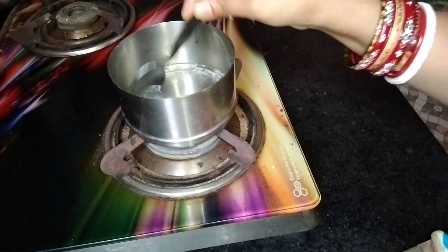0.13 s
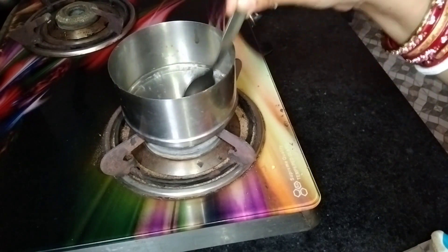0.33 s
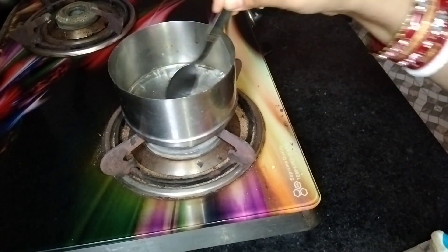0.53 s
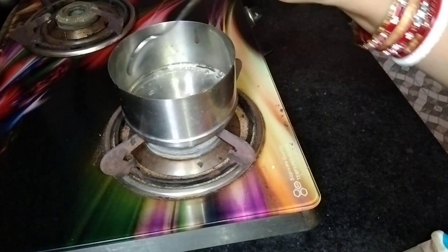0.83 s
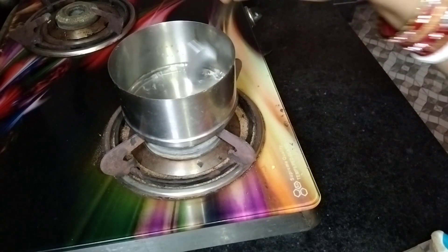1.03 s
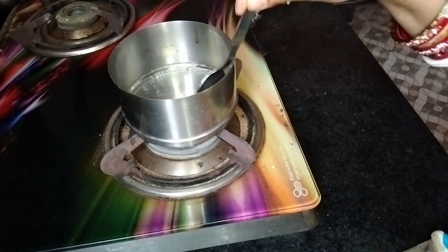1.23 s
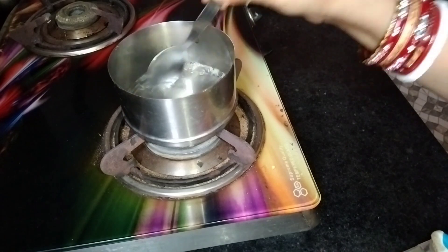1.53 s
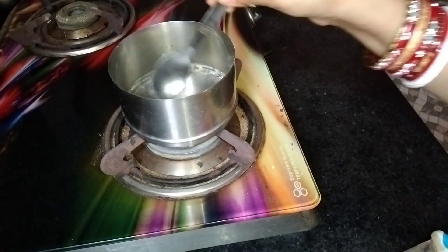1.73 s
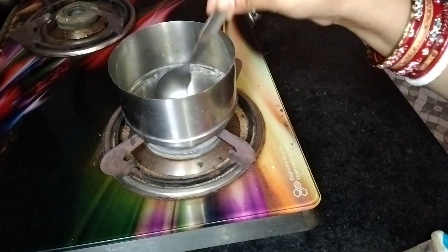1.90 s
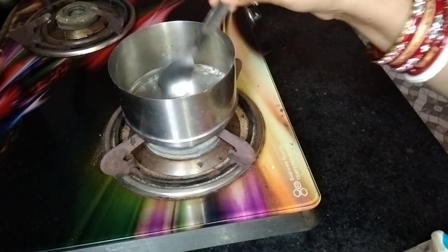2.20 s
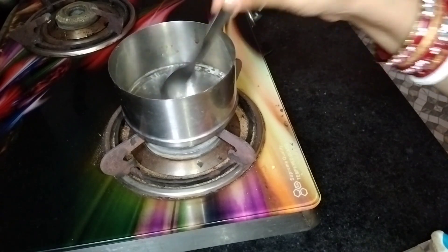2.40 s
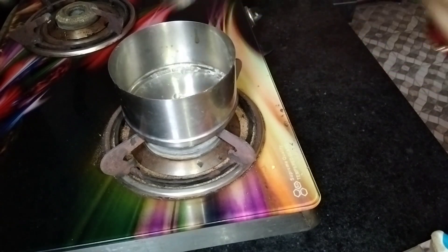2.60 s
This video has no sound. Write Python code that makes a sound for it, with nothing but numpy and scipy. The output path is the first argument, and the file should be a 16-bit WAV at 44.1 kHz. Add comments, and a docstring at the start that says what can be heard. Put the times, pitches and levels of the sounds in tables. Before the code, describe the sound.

Metal spoon scraping round a small metal pot, with irregular clinks and clunks.

```python
"""A steel spoon stirs syrup in a small steel pot on a kitchen gas burner, close to one microphone.
The spoon scrapes round the bottom and rubs a sliding note out of the wall. On each turn it knocks
the wall, so that the pot clunks on its support; struck clear of the syrup, the steel rings on.
Behind the pot, the kitchen answers briefly over a faint hiss."""
import sys
import numpy as np
from scipy import signal
from scipy.fft import rfft, irfft, next_fast_len
from scipy.io import wavfile
from scipy.ndimage import map_coordinates

SR = 44100
rng = np.random.default_rng(int(sys.argv[2]) if len(sys.argv) > 2 else 0)


def to_wav(sig):
    """Store sig (one row per channel, or 1-D mono) as 16-bit WAV at the path in sys.argv[1].

    Samples outside -1..1 are clipped; the rate is SR.
    """
    pcm = np.clip(np.atleast_2d(sig), -1, 1) * 32767
    pcm = np.round(pcm).astype(np.int16)
    wavfile.write(sys.argv[1], SR, pcm.T)  # frames by channels


N = 121275

# Spoon meets pot: t/s, level/dB, clunk of the base/dB, clink/dB, free ring/dB, contact time/s
SPOON_KNOCKS = [(0.2137, -36, -4.5, -1.5, -12, 0.0027), (.2205, -33.5, -2, -21, -31, 0.0055),
                (.296, -35, -1.5, -12, -21, 0.0052), (.9968, -38.5, -6, 0, -3, .0005),
                (1.0154, -38.5, -6, 0, 2, .001), (1.337, -41.5, -29, -9, -18, 0.0022),
                (1.636, -39.5, -12.5, -36, -43, 0.0099), (1.691, -38, 2.5, -13, -42, 0.0052),
                (1.945, -34.5, -2.5, -21, -58, 0.012), (2.203, -34, -0.5, -28, -33, 0.0069),
                (2.394, -45, -8, -0.5, -27, 0.01), (2.434, -33, 0.5, -20, -54, 0.0067)]
# Modes of the loaded pot and of freely ringing steel: f/Hz, level/dB, t60/s
POT_MODES = [(280, -24, .4), (389, -2, .19), (490, 1, .23), (610, -12, .4), (660, -9, .22), (888, -12, .17),
             (962, -4, .16), (1052, 3, .22), (1315, -6, .19), (1480, -11, .22), (2054, -7, .18),
             (2402, -15, .2)]
STEEL_MODES = [(947, -16, 1.15), (2402, -9, .3), (3187, -19, .6), (3583, -14, 1.05), (3768, -19, .9),
               (3885, -4, .27), (4893, -19, 1.1), (5075, -23, .9), (5415, -9, .28), (5490, 2, .42),
               (6145, -21, .5), (6640, -7, .28), (6783, -15, .65), (6939, -11, .42), (7564, -11, .5),
               (7792, -21, .8), (8345, -16, .55), (9857, -14, .25)]
# Spectra of a knock's dull clatter and bright clink: f/Hz, level/dB
CLATTER_SPECTRUM = [(150, -49), (260, -36.5), (350, -4.5), (480, 1), (640, 3), (820, -7), (1050, 2),
                    (1400, -2), (1750, -9), (2300, -4.5), (3500, -17), (5000, -26), (15000, -33)]
CLINK_SPECTRUM = [(800, -61.5), (2300, -55.5), (4300, -15), (5400, 8.5), (6100, -8), (7200, 11.5),
                  (8000, -0.5), (10000, -1.5), (12000, -3.5), (15500, -4)]
# Resonances of the rubbed spoon and wall: f/Hz, width/Hz, level/dB
SCRAPE_RESONANCES = [(1706, 35, -15.5), (2191, 47, -5), (2326, 69, -4.5), (2750, 35, -7), (3106, 54, -4),
                     (3463, 21, -7), (3774, 60, -7.5), (4630, 87, -8), (4954, 44, -9), (5440, 67, -7),
                     (7016, 240, 1), (7340, 230, -1.5), (8553, 92, -0.5), (9760, 70, -3.5),
                     (11120, 170, -7.5), (12200, 150, -13.5), (13460, 430, -8.5)]
# How hard the spoon scrapes: t/s, level/dB
SCRAPE_FORCE = [(.2, -74), (.24, -78), (.28, -52.5), (.33, -51), (.39, -61.5), (.44, -52.5), (.475, -47.5),
                (.52, -50.5), (.556, -65), (.586, -57.5), (.614, -50.5), (.662, -61), (.71, -54),
                (.735, -67), (.82, -91), (.96, -82.5), (1.0, -51.5), (1.035, -47.5), (1.07, -47.5),
                (1.12, -54.5), (1.2, -74.5), (1.33, -77), (1.35, -58), (1.42, -55.5), (1.475, -47),
                (1.53, -52.5), (1.57, -59.5), (1.62, -65), (1.642, -52.5), (1.672, -62.5), (1.69, -45.5),
                (1.735, -72), (1.768, -47.5), (1.82, -54.5), (1.87, -67), (1.903, -48.5), (1.94, -53.5),
                (2.0, -55), (2.04, -49.5), (2.084, -52), (2.112, -68), (2.14, -54.5), (2.162, -47),
                (2.225, -59), (2.26, -54), (2.318, -52), (2.356, -62.5), (2.395, -49), (2.45, -53),
                (2.48, -73), (2.52, -93)]
# Spectrum of steel catching on steel: f/Hz, level/dB
GRIT_SPECTRUM = [(300, -19), (900, -8), (1700, -17), (3000, -10), (4150, -4), (4800, -11.5), (6200, -4),
                 (10500, -6), (15500, -2)]
# The rubbed wall's lowest note as the spoon travels: t/s, f/Hz, level/dB
WALL_NOTE = [(.36, 1020, -54.5), (.47, 1120, -64.5), (.52, 1030, -67), (.57, 1030, -57.5),
             (.63, 1130, -65.5), (.69, 1120, -83), (1.33, 1100, -100), (1.38, 1080, -70), (1.47, 1140, -63),
             (1.54, 1160, -63), (1.62, 1080, -59), (1.8, 1000, -62.5), (1.9, 970, -81), (2.03, 1050, -68.5),
             (2.08, 1000, -54.5), (2.135, 990, -86), (2.27, 1050, -71), (2.32, 1040, -48.5),
             (2.37, 1020, -78), (2.5, 1050, -71), (2.6, 1040, -77)]
# Single notes of the touched wall: t/s, f/Hz, level/dB, t60/s, slide/(Hz per s)
WALL_PLINKS = [(.216, 1047, -21, 0.062, 0), (.216, 5400, -34, 0.077, -16), (.712, 661, -50, 0.053, 2),
               (.721, 1054, -47, .22, -200), (1.02, 625.5, -45, 0.24, -1), (1.337, 1080, -31, .07, 0),
               (1.338, 1260, -34, .06, 0), (1.338, 1460, -39, .06, 0), (1.345, 567.5, -46.5, 0.24, 700),
               (1.337, 3915, -50, 0.45, -8), (1.34, 7555, -49, .15, -6), (2.157, 995, -46, 0.33, -700),
               (2.4, 2000, -30, 0.037, 6), (2.4, 743, -45.5, 0.18, 0), (2.614, 1030, -57.5, 0.14, -10)]
# Decay of the kitchen: f/Hz, t60/s
KITCHEN_DECAY = [(200, 0.34), (600, 0.44), (2000, 0.34), (4000, 0.33), (6000, .3), (7500, 0.29),
                 (15000, 0.17)]
# Background hiss and low rumble at the microphone: f/Hz, level/dB
HISS_SPECTRUM = [(25, -25), (55, -8), (125, -0.5), (200, -10.5), (280, -3), (450, -17.5), (1200, -18.5),
                 (3000, -30), (4500, -33.5), (6500, -33), (8500, -21.5), (11000, -31), (15000, -26.5)]

POT_DB, CLATTER_DB, PUNCH_DB, CLINK_DB, CRACK_DB, STEEL_DB = -10, 1.5, 5, 2.5, -10, -6
SCRAPE_DB, GRIT_DB, RIM_DB, WALL_DB = -1, -4, -28, 0.5
ROOM_DB, HISS_DB = -5.5, -72


def spoon_knocks(base_hz=720, low_cut_hz=230):
    """Each blow sets off the pot's modes, a clatter, a clink and the steel; little of it sounds below about 230
    Hz."""
    out, t = np.zeros(N), np.arange(SR) / SR
    clatter_fade = fade(t, t60=0.09) + amp(PUNCH_DB) * fade(t, t60=0.022)
    clink_fade = fade(t, t60=0.074) + amp(CRACK_DB) * fade(t, t60=0.0064)
    for start, db, base_db, clink_db, ring_db, contact_s in SPOON_KNOCKS:
        pot = amp(POT_DB) * ring(POT_MODES, t)
        clatter = amp(CLATTER_DB) * clatter_fade * noise(CLATTER_SPECTRUM, SR)
        clunk = filtered(pot + clatter, lambda hz: amp(base_db / (1 + (hz / base_hz) ** 6)))  # low shelf
        clink = amp(CLINK_DB + clink_db) * clink_fade * noise(CLINK_SPECTRUM, SR)
        steel = amp(STEEL_DB + ring_db) * ring(STEEL_MODES, t)
        attack = np.minimum(t / contact_s, 1) ** 1.22
        add(out, start, amp(db) * attack * (clunk + clink + steel))
    return signal.sosfilt(signal.butter(2, low_cut_hz, "highpass", fs=SR, output="sos"), out)


def spoon_scrape(catches_per_s=3000, spread_db=3.8, swell_db=4.5, slide_hz=70, judder_db=2):
    """Steel catches on steel; resonances slide and swell as the contact moves, and the rim sings along."""
    caught = rng.random(N) < catches_per_s / SR
    direction, strength = rng.standard_normal((2, N))
    catches = caught * np.sign(direction) * amp(spread_db * strength)
    grit = unit(filtered(catches, lambda hz: amp(along(GRIT_SPECTRUM, hz))))
    resonances = np.zeros(N)
    for hz, width_hz, db in SCRAPE_RESONANCES:
        swell = amp(db + swell_db * wobble(per_s=34))
        resonances += swell * rubbed(hz + slide_hz * wobble(per_s=20), width_hz)
    force_db, = curves(SCRAPE_FORCE)
    force = amp(force_db + judder_db * wobble(per_s=170))
    rub = force * (amp(SCRAPE_DB) * unit(resonances) + amp(GRIT_DB) * grit)
    rim = ring([(5490, 0, 0.8)], np.arange(SR) / SR)  # f/Hz, level/dB, t60/s
    return rub + amp(RIM_DB) * convolved(rub, rim)


def wall_rub():
    """The rubbed wall sings a rough note that slides as the spoon travels."""
    hz, db = curves(WALL_NOTE)
    return amp(db + WALL_DB) * rubbed(hz, width_hz=43)


def wall_plinks(rise_s=0.0084):
    """A touch brings short notes out of the wall, some bent by the syrup."""
    out, t = np.zeros(N), np.arange(SR // 2) / SR
    for start, hz, db, t60, slide in WALL_PLINKS:
        level = amp(db) * fade(t, t60) * np.minimum(t / rise_s, 1)
        add(out, start, level * np.sin(2 * np.pi * (hz + slide * t / 2) * t))
    return out


def kitchen_reverb(pot):
    """The room's short tail reaches the microphone 5 ms behind the pot and dulls as it dies."""
    hz, t, spectrum = signal.stft(rng.standard_normal(SR // 2), SR, nperseg=256)
    decay = fade(t, along(KITCHEN_DECAY, hz)[:, None])
    _, tail = signal.istft(spectrum * decay, SR, nperseg=256)
    tail[:SR // 200] = 0
    return convolved(pot, tail)


def hiss():
    """A faint, steady hiss with a low rumble lies behind the pot."""
    return amp(HISS_DB) * noise(HISS_SPECTRUM, N)


def ring(modes, t, beat_hz=22, beat_depth=0.25):
    """Decaying modes, a little different at each blow; they beat, as the pot is not quite round."""
    out = np.zeros(len(t))
    for hz, db, t60 in modes:
        phase, beat, beat_phase = rng.random(3)
        waver = 1 + beat_depth * np.sin(2 * np.pi * (beat_hz * (0.5 + beat) * t + beat_phase))
        level = amp(db + rng.normal(0, 1)) * fade(t, t60)
        out += level * waver * np.sin(2 * np.pi * (hz * t + phase))
    return out


def rubbed(hz, width_hz):
    """A resonance kept sounding by friction, following the pitch curve hz."""
    a, b = filtered(rng.standard_normal((2, N)), lambda f: 1 / (1 + (f / width_hz) ** 2))
    phase = 2 * np.pi * np.cumsum(hz) / SR
    return unit(a * np.cos(phase) + b * np.sin(phase))


def noise(spectrum, size):
    """Coloured noise of rms 1."""
    return unit(filtered(rng.standard_normal(size), lambda hz: amp(along(spectrum, hz))))


def wobble(per_s):
    """A smooth random curve with per_s knots a second."""
    return map_coordinates(rng.standard_normal(1024), [np.arange(N) * per_s / SR], mode="wrap")


def curves(rows):
    """One curve per column after the time; the last is a level, silent outside the rows."""
    times, *columns, db = np.transpose(rows)
    t = np.arange(N) / SR
    level_db = np.interp(t, times, db, left=-np.inf, right=-np.inf)
    return [np.interp(t, times, column) for column in columns] + [level_db]


def along(points, hz):
    """(f/Hz, value) points read at hz on a log axis."""
    freqs, values = np.transpose(points)
    return np.interp(np.log(hz + 1), np.log(freqs + 1), values)


def filtered(x, response):
    """x shaped by a gain that depends on frequency."""
    n = x.shape[-1]
    padded = next_fast_len(n + SR // 4)
    return irfft(rfft(x, padded) * response(np.fft.rfftfreq(padded, 1 / SR)), padded)[..., :n]


def convolved(x, impulse):
    """x through an impulse response scaled to unit energy."""
    return signal.fftconvolve(x, impulse / np.linalg.norm(impulse))[:N]


def fade(t, t60):
    """A fall of 60 dB every t60 seconds."""
    return amp(-60 * t / t60)


def amp(db):
    """Decibels to gain."""
    return 10 ** (np.asarray(db) / 20)


def unit(x):
    """Scaled to rms 1."""
    return x / np.sqrt(np.mean(x ** 2) + 1e-20)


def add(track, start_s, x):
    """Mix x into track from start_s on."""
    part = track[round(start_s * SR):][:len(x)]
    part += x[:len(part)]


def scene():
    """Spoon and pot up close, the kitchen and its hiss behind, in mono."""
    pot = spoon_knocks() + spoon_scrape() + wall_rub() + wall_plinks()
    return (pot + amp(ROOM_DB) * kitchen_reverb(pot) + hiss())[None]


def record(dry, top_hz=15600):
    """The recorder keeps nothing above its band limit."""
    return filtered(dry, lambda hz: hz < top_hz)


dry = scene()
out = record(dry)
to_wav(out)
```